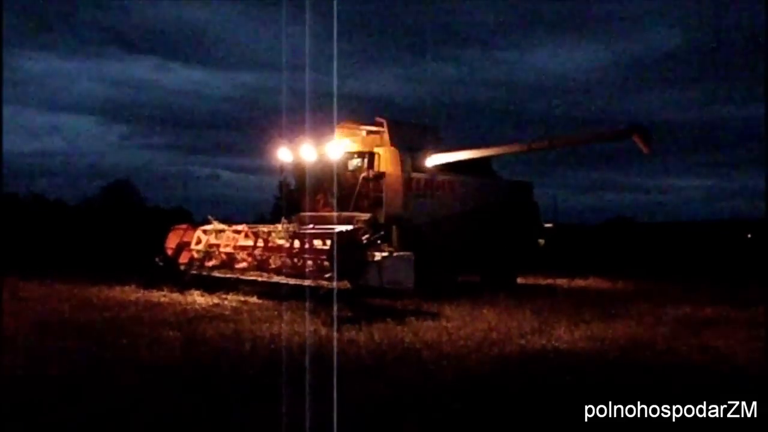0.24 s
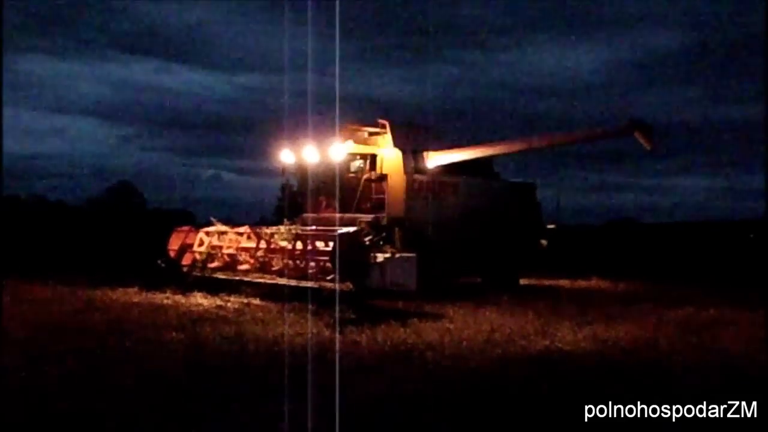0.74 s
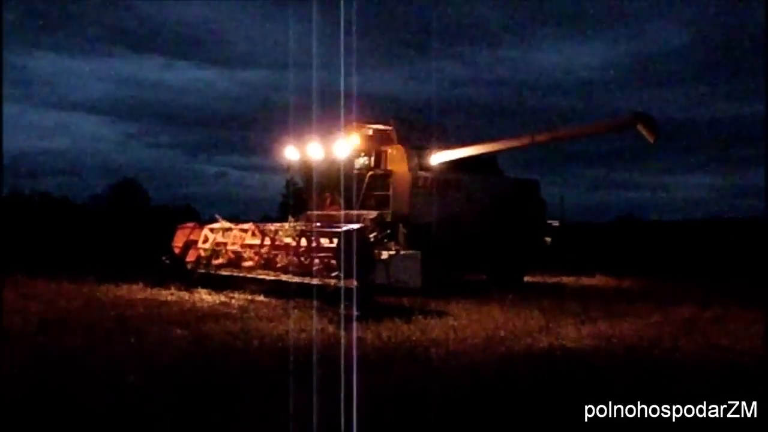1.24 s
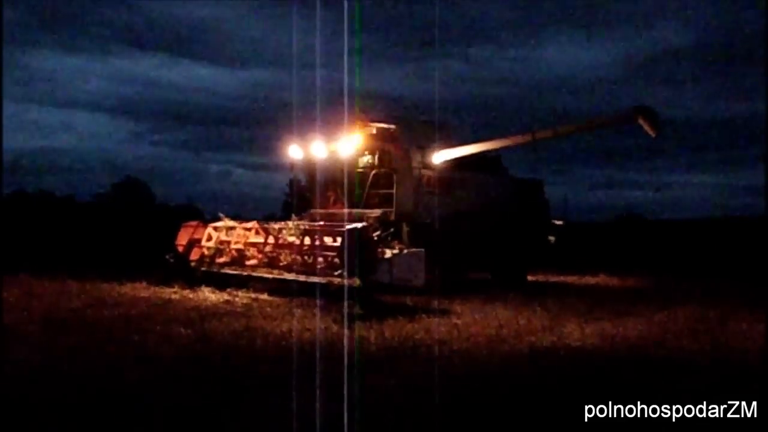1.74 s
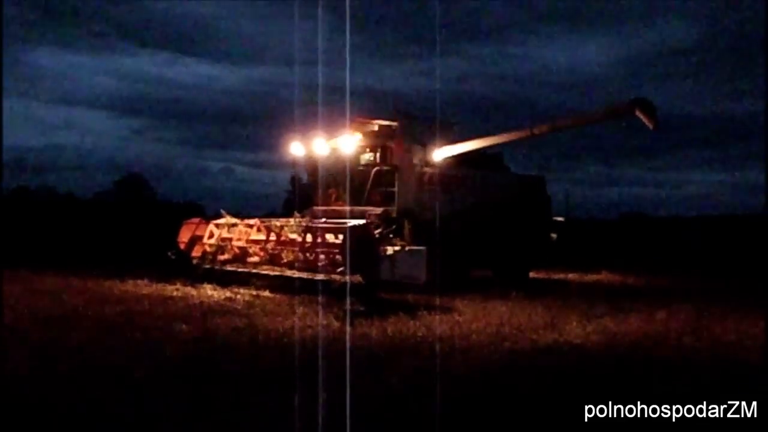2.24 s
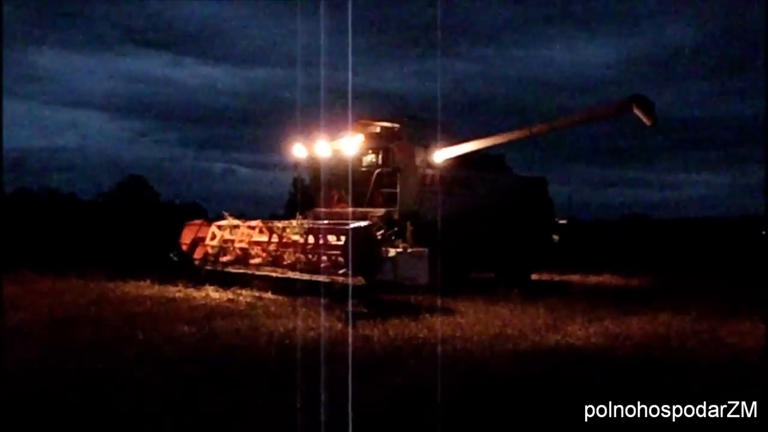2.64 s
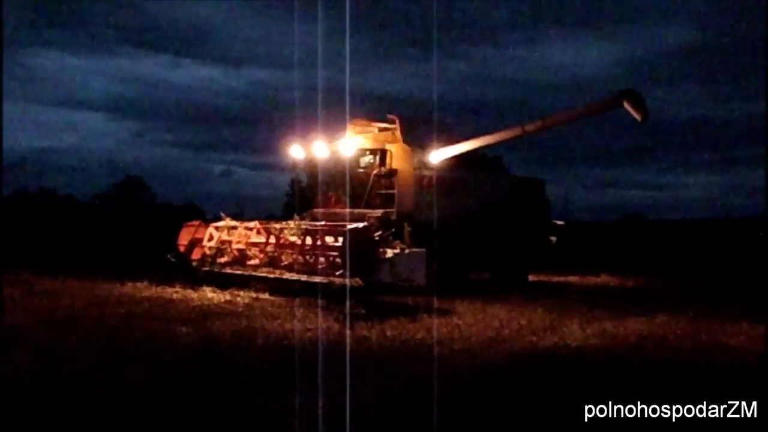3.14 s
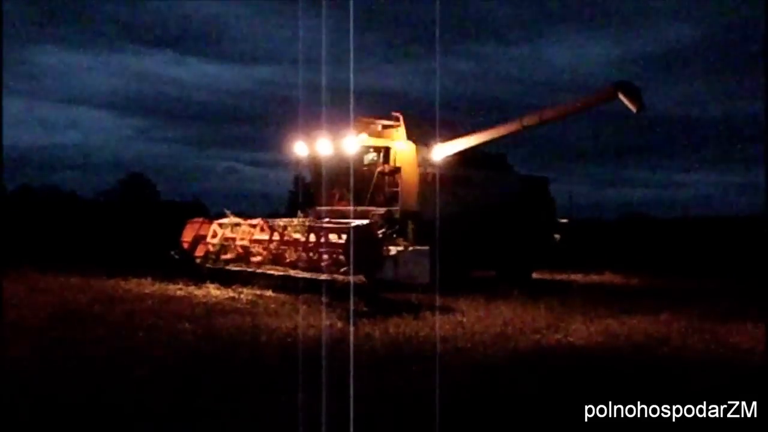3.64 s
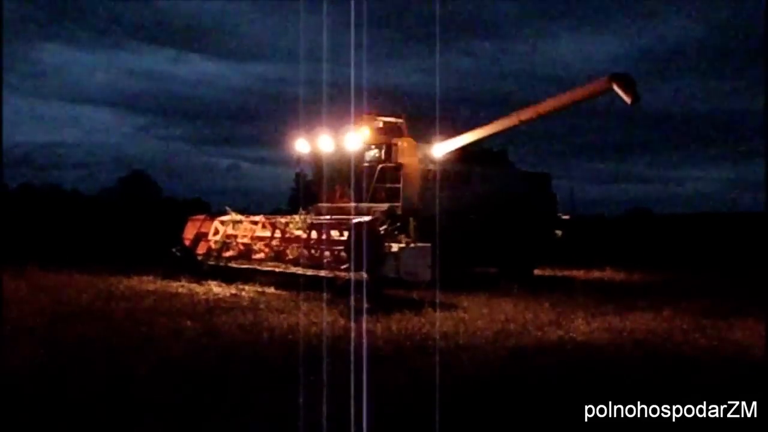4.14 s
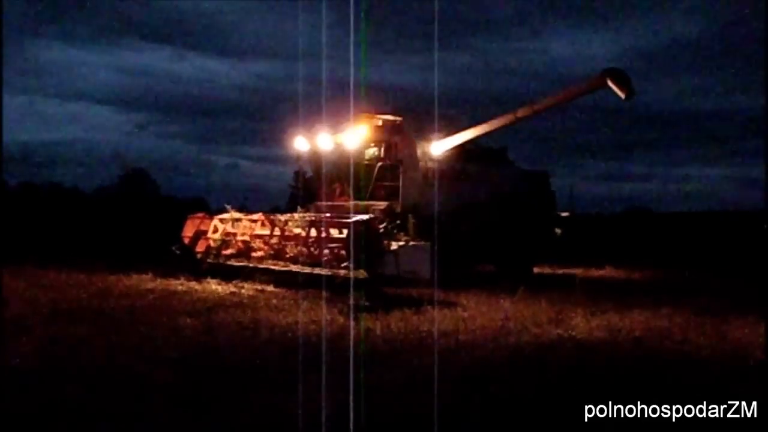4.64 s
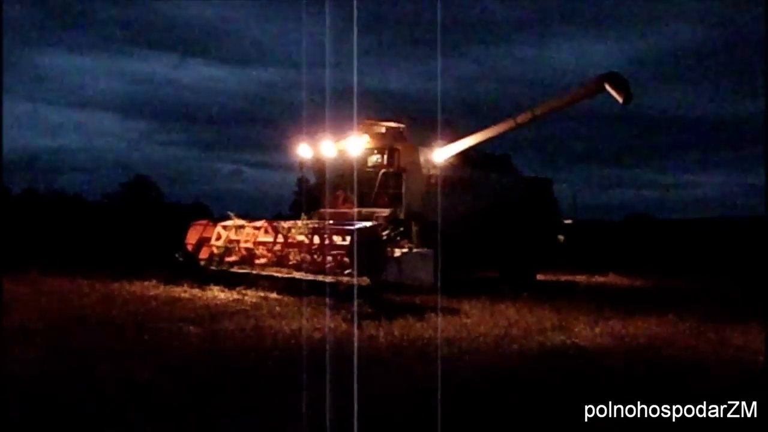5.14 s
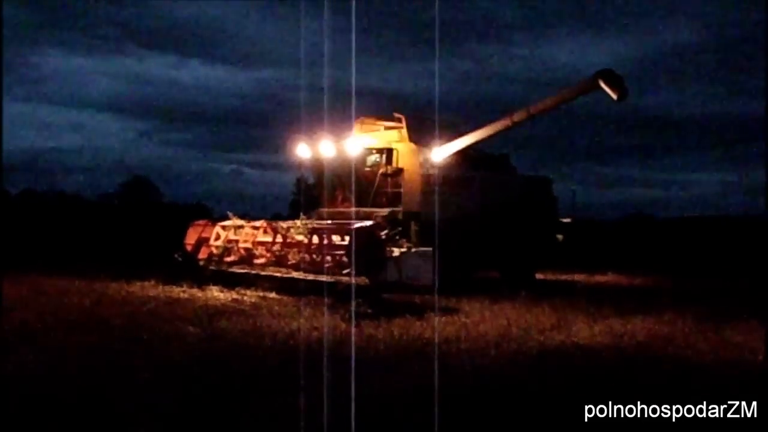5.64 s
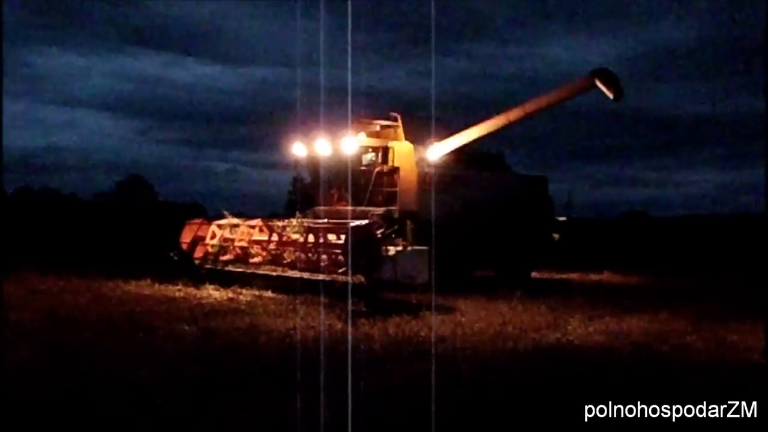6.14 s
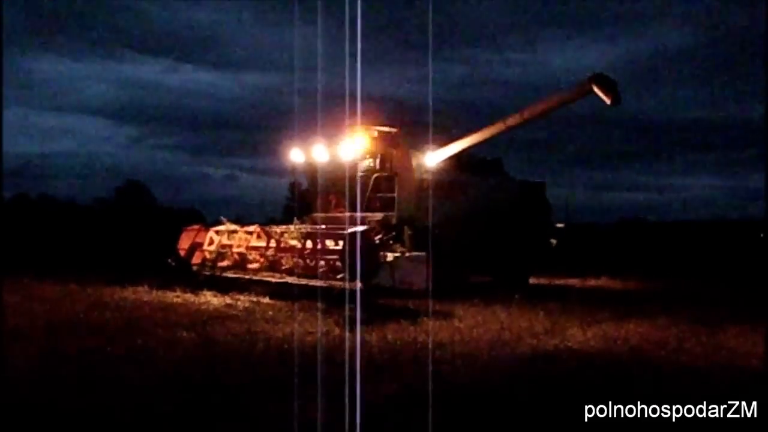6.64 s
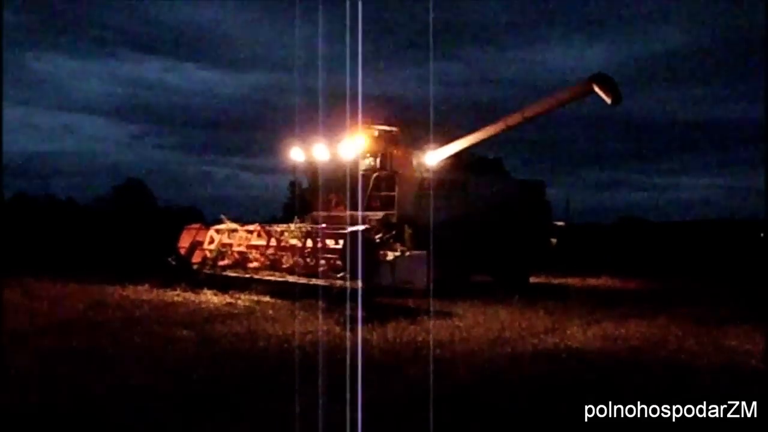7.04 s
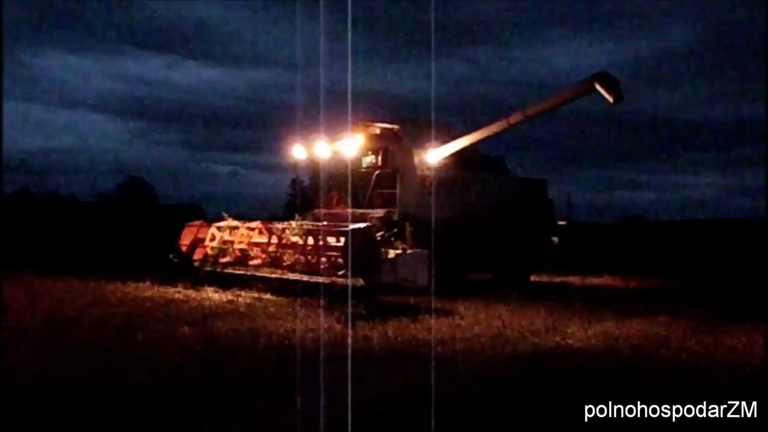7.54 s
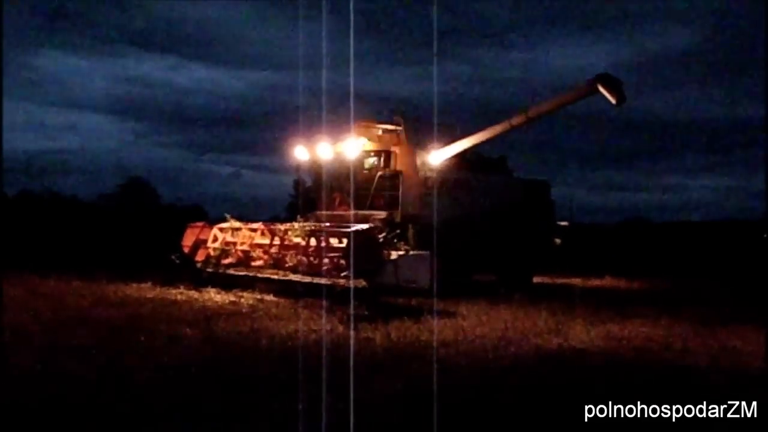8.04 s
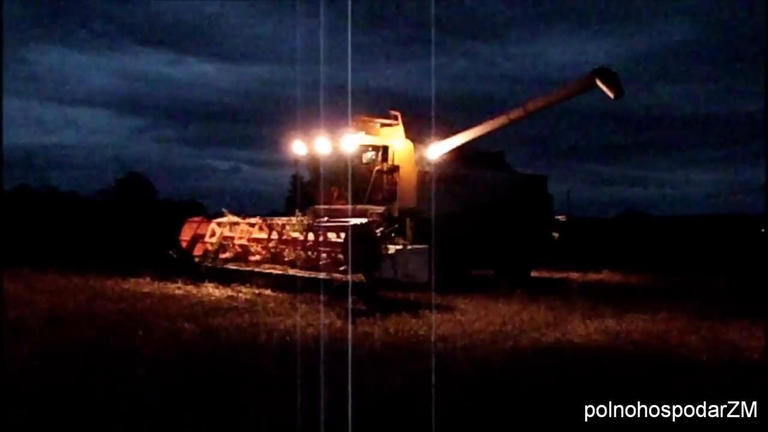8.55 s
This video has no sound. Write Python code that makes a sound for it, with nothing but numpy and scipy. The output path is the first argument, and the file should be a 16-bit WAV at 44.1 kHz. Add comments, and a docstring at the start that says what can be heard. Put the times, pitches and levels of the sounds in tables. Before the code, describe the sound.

A combine harvester runs in an open field for the whole nine seconds or so. Its diesel engine gives a low drone and a fast, even clatter, blended with the broad roar and high hiss of the fan and threshing gear. A hydraulic pump and gears whine at a steady pitch, wavering slightly in loudness. Wind buffets the microphone in uneven low surges, first at about 0.8 and 2 seconds. From 4 seconds it strengthens, with short fluttering thumps and a faint hiss through the stalks, and is strongest between 5.5 and 6.5 seconds. A faint, thin, high whistle swells around 6 seconds. After a few more thumps just past 7 seconds the wind drops. A tiny tick sounds near 8 seconds, then the whistle and the wind rumble swell again around 8.5 seconds as the machine keeps running.

```python
"""A combine harvester runs in a stubble field. From the start its six-cylinder diesel drones and
clatters, its hydraulic pump whines, its gears sing, and its fan and threshing gear rush.
The wind bends the sound on its way over the field and buffets the microphone in low surges.
From about 4 s the wind rises: eddies thump, a gust hisses through the stalks, a thin whistle swells.
After 7 s the wind drops, a tiny tick sounds near 8 s, and the whistle and the wind swell once more."""
import sys
import numpy as np
from scipy.fft import rfft, irfft, next_fast_len
from scipy.io import wavfile
from scipy.ndimage import uniform_filter1d, map_coordinates

SR = 44100
rng = np.random.default_rng(int(sys.argv[2]) if len(sys.argv) > 2 else 0)


def file_out(sig):
    """Save sig as 16-bit WAV at sys.argv[1]."""
    # one column per channel
    cols = np.atleast_2d(sig).T
    # limit, then scale
    lim = np.clip(cols, -1, 1)
    pcm = np.round(lim * 32767).astype(np.int16)
    wavfile.write(sys.argv[1], SR, pcm)


N = 387198

# Levels in the tables are relative: the functions add their own gains.
# tones of the exhaust: (multiple of the firing rate, level [dB])
EXHAUST_TONES = [(1, -39.5), (2, -66), (3, -53.5)]
# how hard each cylinder knocks: (level [dB])
CYLINDER_KNOCKS = [5.5, -3.5, 1, 4, -1, 4]
# tone colour of a knock in the engine block: (frequency [Hz], level [dB])
KNOCK_SPECTRUM = [(200, -39), (550, 4), (760, -5), (1050, 3.5), (1600, -0.5), (2400, -1), (4200, -3),
                  (5200, -13), (8000, -12.5), (11000, -30)]
# overtones of the pump: (multiple of the pump rate, level [dB])
PUMP_OVERTONES = [(2, -9), (4, -11.5), (6, -15.5), (8, -8), (9, -4.5), (10, 1.5), (11, -2.5), (12, -9.5),
                  (13, -10.5), (14, -8), (15, -26), (16, -13.5), (17, -17)]
# how the pump's whine swells and fades: (time [s], tenth overtone [dB], eleventh overtone [dB])
PUMP_LEVELS = [(0, -52, -54), (.33, -52.5, -52), (.88, -54, -59.5), (1.62, -53, -57), (1.88, -58.5, -61),
               (2.45, -56.5, -61), (2.98, -53, -56), (3.17, -54.5, -55), (3.85, -49, -52.5),
               (4.12, -51.5, -51.5), (4.35, -57, -53.5), (4.8, -55, -55.5), (5.7, -53.5, -50.5),
               (6.28, -54.5, -54), (6.55, -58, -62), (7.1, -59.5, -61), (8.1, -56.5, -58.5),
               (8.45, -55.5, -53.5), (8.78, -58, -56)]
# tones of the gears and belts: (frequency [Hz], level [dB])
GEAR_TONES = [(264, -56), (331, -63), (578, -70), (651, -62.5), (990, -63.5), (1039, -59), (1080, -67),
              (1229, -71), (1379, -65.5), (1999, -61.5), (2548, -69.5), (3727, -77)]
# a cover that the gears keep ringing: (frequency [Hz], level [dB])
COVER_SPECTRUM = [(300, -80), (900, -19), (1000, -8), (1040, -4), (1090, -8), (1200, -11), (4000, -100)]
# swells of the thin whistle: (time [s], level [dB])
WHISTLE_SWELLS = [(4.5, -10), (5.95, 2.5), (8.5, 3)]
# roar of the fan and threshing gear: (frequency [Hz], level [dB])
ROAR_SPECTRUM = [(30, 4.5), (130, 12), (270, 2), (380, -3.5), (600, 6), (760, -2.5), (1050, -1),
                 (1600, -0.5), (2200, -0.5), (2900, -1.5), (4250, 0), (4800, -6), (5400, -12), (8000, -33)]
# their high hiss: (frequency [Hz], level [dB])
HISS_SPECTRUM = [(3000, -42), (5200, -8), (6200, 1.5), (7000, -0.5), (8200, 1.5), (9200, -4),
                 (10500, -12.5), (12000, -19.5), (14300, -27)]
# how well the air carries the machine over the field: (time [s], gain [dB])
AIR_CARRY = [(0, 0.5), (.42, .8), (.9, -.8), (1.55, 0), (1.85, -1.4), (2.62, -1.9), (2.93, -0.3), (3.78, 2),
             (4.1, .5), (4.45, .8), (4.67, -1), (4.98, 2.5), (5.33, 2), (5.5, .9), (6.2, .3), (6.8, -1.2),
             (7.3, -0.2), (7.75, -1.9), (8.4, .7), (8.78, -.8)]
# strength of the wind at the microphone: (time [s], level [dB])
WIND_LEVELS = [(0, -34), (.25, -38.5), (1.2, -40.5), (1.65, -39), (2.1, -33.5), (2.42, -36), (2.65, -35.5),
               (3.1, -37.5), (3.7, -32.5), (4.35, -35.5), (4.92, -32.5), (5.55, -27), (5.92, -33),
               (6.2, -27), (7.0, -35), (7.45, -38.5), (8.5, -38), (8.78, -32.5)]
# short gusts on the microphone: (time [s], rumble [dB], turbulence [dB])
WIND_SURGES = [(.76, -22.5, -42), (1.79, -28, -37.5), (2.2, -28.5, -30.5), (2.95, -35, -37),
               (3.2, -26.5, -40), (3.45, -29, -33), (3.72, -28, -29), (4.0, -24, -35), (4.65, -27, -26),
               (5.06, -29, -31), (5.42, -22, -37), (5.68, -29, -26.5), (6.13, -26, -26), (6.37, -21.5, -28),
               (6.8, -30, -31), (7.13, -22, -30), (7.27, -29, -34.5), (7.48, -26, -41), (8.27, -25, -42),
               (8.64, -20.5, -38)]
# deep rumble of the wind: (frequency [Hz], level [dB])
RUMBLE_SPECTRUM = [(3, -14), (10, 2), (28, 1), (48, -5), (75, -14), (120, -23), (200, -38), (1000, -120)]
# turbulence, the churning of the air: (frequency [Hz], level [dB])
TURBULENCE_SPECTRUM = [(40, -7), (75, 0), (105, 1.5), (155, -3), (250, -9), (380, -18.5), (700, -32),
                       (1400, -40), (8000, -120)]
# eddies, small whirls of air that hit the microphone:
# (time [s], pulse [dB], pulse half-width [s], flutter [dB], flutter half-length [s])
EDDY_HITS = [(.902, -17.5, .003, -46, .01), (1.775, -16, .0049, -50, .008),
             (3.98, -12.5, 0.0028, -40, 0.016), (4.2003, -11.5, 0.0014, -34, .006),
             (4.628, -15, 0.00049, -42, .004), (4.655, -9.5, 0.00088, -25.5, .021),
             (5.05, -12, .0012, -33.5, 0.034), (5.589, -13, .00054, -26.5, 0.024),
             (5.632, -7, 0.0018, -21, 0.017), (5.749, -20, 0.00055, -30.5, 0.024),
             (6.152, -10, 0.0014, -25.5, 0.018), (6.346, -9, 0.001, -26, 0.018),
             (6.358, -7.5, .0017, -22.5, .007), (6.448, -10.5, .0013, -34.5, 0.011),
             (6.792, -14, 0.0012, -26.5, .009), (7.092, -14.5, .0006, -31, .005),
             (7.114, -11.5, .00038, -18, 0.0064), (7.14, -22, .0016, -27.5, 0.013),
             (8.678, -17, 0.001, -42, .01), (8.766, -10.5, .0015, -34.5, 0.014)]
# flutter around an eddy: (frequency [Hz], level [dB])
FLUTTER_SPECTRUM = [(50, -16.5), (150, -2.5), (330, -0.5), (600, -9.5), (1000, -21), (1600, -27.5),
                    (3000, -60), (12000, -120)]
# air hissing through cut stalks: (frequency [Hz], level [dB])
STUBBLE_SPECTRUM = [(100, -50), (400, -7), (850, 1), (1300, -16), (2500, -7.5), (12000, -80)]

FIRING_HZ, PUMP_HZ, WHISTLE_HZ, TOP_HZ = 60, 217.5, 4275, 14450
MACHINE_DB, HISS_DB = -48.5, -50.5  # base levels: one for knock and roar, one for hiss
BREEZE_DB, RUMBLE_DB = -36, -31  # the wind's usual strength, and its rumble at that strength


def diesel(clock, exhaust_db, knock_db, knock_decay_s, repeat):
    """The exhaust drones, and each firing of a cylinder knocks once in the engine block."""
    firings = clock * FIRING_HZ
    drone = sum(amp(db) * unit(np.sin(2 * np.pi * (k * firings + rng.random())))
                for k, db in EXHAUST_TONES)
    cylinder = firings.astype(int) % len(CYLINDER_KNOCKS)
    knocks = amp(CYLINDER_KNOCKS)[cylinder] * np.exp(-(firings % 1) / FIRING_HZ / knock_decay_s)
    clatter = coloured(knocks * engine_noise(clock, repeat), KNOCK_SPECTRUM)
    carry_db, = curves(AIR_CARRY)
    return amp(exhaust_db) * drone + amp(MACHINE_DB + carry_db + knock_db) * clatter


def engine_clock(drift):
    """The engine's own time in seconds: all its shafts speed up and slow down together."""
    return np.cumsum(1 + drift * wobble(3)) / SR


def engine_noise(clock, repeat):
    """White noise of which a share (repeat, 0 to 1) comes back alike in every engine cycle."""
    cycle = round(SR * len(CYLINDER_KNOCKS) / FIRING_HZ)
    alike = rng.standard_normal(cycle)[(clock * SR).astype(int) % cycle]
    return np.sqrt(repeat) * alike + np.sqrt(1 - repeat) * rng.standard_normal(N)


def fan_and_thresher(clock, roar_gain_db):
    """Fan and threshing gear make a broad roar and a hiss that come and go with the air."""
    carry_db, = curves(AIR_CARRY)
    roar = coloured(engine_noise(clock, repeat=0.25), ROAR_SPECTRUM)
    roar = fine_ripple(roar, ripple_db=1.24, spacing_hz=24.77)
    hiss = coloured(engine_noise(clock, repeat=0.17), HISS_SPECTRUM)
    hiss = fine_ripple(hiss, ripple_db=1.2, spacing_hz=40.05)
    dip_db = -4 * np.exp(-((clock - 3.14) / 0.048) ** 2)  # the hiss dips briefly
    roar_db = MACHINE_DB + roar_gain_db + carry_db + 0.62 * wobble(14)
    hiss_db = HISS_DB + 1.35 * carry_db + dip_db + 0.85 * wobble(18)
    return amp(roar_db) * roar + amp(hiss_db) * hiss


def fine_ripple(x, ripple_db, spacing_hz):
    """Makes many narrow pitches a little louder or softer, faintly colouring the noise."""
    bumps_db = ripple_db * rng.standard_normal(4000)
    bumps_hz = spacing_hz * np.arange(len(bumps_db))
    return unit(filtered(x, lambda hz: amp(np.interp(hz, bumps_hz, bumps_db))))


def hydraulic_pump(clock, tenth_gain_db, eleventh_gain_db, smear):
    """Each pump tooth gives one pressure pulse; the overtones fade differently on their way."""
    tenth_db, eleventh_db = curves(PUMP_LEVELS)
    common_db = (tenth_db + eleventh_db) / 2
    other_db = (common_db + common_db.mean()) / 2 + 3.5  # the other overtones swell half as far
    level_db = {10: tenth_db + tenth_gain_db, 11: eleventh_db + eleventh_gain_db}
    teeth = PUMP_HZ * clock + 0.0045 * wobble(40)
    whine = np.zeros(N)
    for k, db in PUMP_OVERTONES:
        # the pipes delay the overtones by differing amounts, least at the tenth and more the farther away,
        # which spreads the pulse
        turns = k * teeth - smear * (k - 10) ** 2
        whine += amp(db + level_db.get(k, other_db)) * tone(turns, waver_db=1.3, rate=16)
    return whine


def gears(clock, whistle_db, cover_db):
    """Gears and belts sing roughly and shake their cover, with one thin whistle above them."""
    growth_db = -2 + .5 * clock  # slowly getting louder
    singing = sum(amp(db) * tone(hz * clock + rng.random() + 0.08 * wobble(40), waver_db=2.0, rate=22)
                  for hz, db in GEAR_TONES)
    whistle = tone(WHISTLE_HZ * clock + 0.13 * wobble(40), waver_db=3.5, rate=25)
    whistle_gain = amp(whistle_db) * (amp(-0.5) + swells(WHISTLE_SWELLS, half_length_s=.3))
    cover = amp(cover_db + 2 * growth_db) * noise(COVER_SPECTRUM)
    return amp(growth_db) * singing + cover + whistle_gain * whistle


def wind(turbulence_gain_db, lump_db, gusty_db, surge_half_s):
    """Wind pushes on the microphone in slow swings, with lumpy turbulence in the gusts."""
    wind_db, = curves(WIND_LEVELS)
    surges = np.array(WIND_SURGES)
    rumble = noise(RUMBLE_SPECTRUM)
    # even out the noise so that the gust, more than chance, sets the size of the swings
    power = np.abs(uniform_filter1d(rumble ** 2, size=6000))
    rumble = unit(rumble / np.sqrt(power + .01))
    rumble_db = RUMBLE_DB + 0.79 * (wind_db - BREEZE_DB) + gusty_db * wobble(12)
    swing = np.hypot(amp(rumble_db), swells(surges[:, [0, 1]], surge_half_s))
    turbulence = unit(amp(lump_db * wobble(45)) * noise(TURBULENCE_SPECTRUM))
    # in the lulls the flow turns smooth and the turbulence dies away
    stirred = 1 / (1 + amp(-43.5 - wind_db) ** 2)
    churn = np.hypot(stirred * amp(wind_db), swells(surges[:, [0, 2]], surge_half_s))
    return swing * rumble + amp(turbulence_gain_db) * churn * turbulence


def eddies(pulse_gain_db, flutter_gain_db):
    """Each whirl of air sucks at the microphone for a moment, inside a short flutter."""
    t = np.arange(N) / SR
    pulses, flutter = np.zeros(N), np.zeros(N)
    for at_s, pulse_db, width_s, flutter_db, length_s in EDDY_HITS:
        near = np.abs(t - at_s) < .1
        offset_s = t[near] - at_s
        pulses[near] -= amp(pulse_db) * (1 + (offset_s / width_s) ** 2 / 2) ** -2
        flutter[near] += amp(flutter_db) * np.exp(-np.abs(offset_s / length_s) ** 1.64)
    return amp(pulse_gain_db) * pulses + amp(flutter_gain_db) * flutter * noise(FLUTTER_SPECTRUM)


def stubble(gust_db, rest_db):
    """Air hisses softly through the cut stalks; one gust rises, holds and dies away."""
    times_s = np.cumsum([4.44, 0.26, .6, .6])  # start, then the lengths of rise, hold and fall
    gust = np.interp(np.arange(N) / SR, times_s, [0, 1, 1, 0])
    return (amp(rest_db) + amp(gust_db) * gust) * amp(wobble(20)) * noise(STUBBLE_SPECTRUM)


def tick(at_s, db, hz, half_length_s):
    """One tiny bright tick close by."""
    offset_s = np.arange(N) / SR - at_s
    return swells([(at_s, db)], half_length_s) * np.sin(2 * np.pi * hz * offset_s)


def amp(db):
    """Turn decibels into a factor to multiply by."""
    return 10 ** (np.asarray(db) / 20)


def unit(x):
    """Scale a signal to an average strength (rms) of 1."""
    return x / np.sqrt(np.mean(x ** 2) + 1e-20)


def curves(rows):
    """Join a table's points with lines: one curve for each column after the time."""
    times_s, *columns = np.transpose(rows)
    return [np.interp(np.arange(N) / SR, times_s, column) for column in columns]


def swells(rows, half_length_s):
    """Bell-shaped rises and falls, one for each row of (time [s], level [dB])."""
    t = np.arange(N) / SR
    return sum(amp(db) * np.exp(-((t - at_s) / half_length_s) ** 2) for at_s, db in rows)


def wobble(rate):
    """A smooth curve through random points, `rate` of them a second."""
    points = rng.standard_normal(int(N * rate / SR) + 4)
    return map_coordinates(points, [np.arange(N) * rate / SR], mode="nearest")


def tone(turns, waver_db, rate):
    """A pure tone of strength 1 whose level wavers in the moving air."""
    return unit(np.sin(2 * np.pi * turns) * amp(waver_db * wobble(rate)))


def filtered(x, response):
    """Multiply each frequency in x by the gain that response gives it."""
    size = next_fast_len(N + SR // 2)
    return irfft(rfft(x, size) * response(np.fft.rfftfreq(size, 1 / SR)), size)[:N]


def coloured(x, spectrum):
    """Give x the tone colour of a (frequency [Hz], level [dB]) table, at strength 1."""
    points_hz, db = np.transpose(spectrum)
    return unit(filtered(x, lambda hz: amp(np.interp(np.log(hz + 1e-3), np.log(points_hz), db))))


def noise(spectrum):
    """Fresh noise of strength 1 with the given tone colour."""
    return coloured(rng.standard_normal(N), spectrum)


def scene():
    """The harvester across the stubble and the wind at the microphone."""
    clock = engine_clock(drift=.0005)
    machine = diesel(clock, exhaust_db=2.0, knock_db=-3, knock_decay_s=0.0092, repeat=0.69)
    machine += gears(clock, whistle_db=-63, cover_db=-61.5)
    machine += hydraulic_pump(clock, tenth_gain_db=1.5, eleventh_gain_db=2.0, smear=0.0746)
    machine += fan_and_thresher(clock, roar_gain_db=3.5)
    air = wind(turbulence_gain_db=0.8, lump_db=2.5, gusty_db=1.5, surge_half_s=0.07)
    air += stubble(gust_db=-49.5, rest_db=-64.5)
    air += eddies(pulse_gain_db=1.3, flutter_gain_db=-1.06)
    return (machine + air + tick(at_s=7.958, db=-27.0, hz=9500, half_length_s=.00016))[None]


def record(dry):
    """Cut away the highest treble, above TOP_HZ."""
    return filtered(dry[0], lambda hz: hz < TOP_HZ)[None]


dry = scene()
out = record(dry)
file_out(out)
```